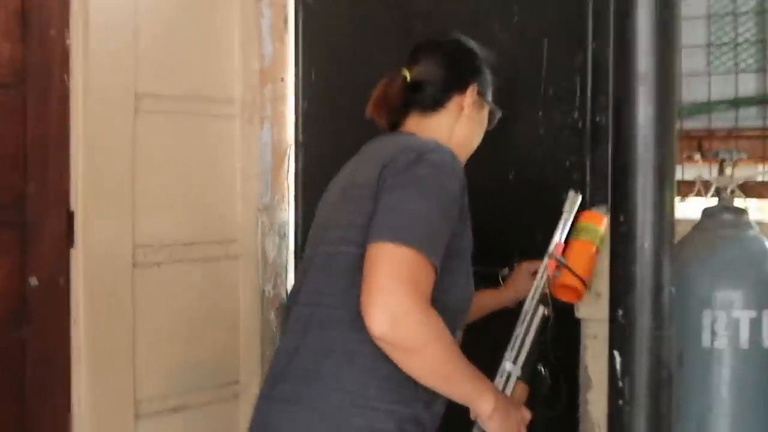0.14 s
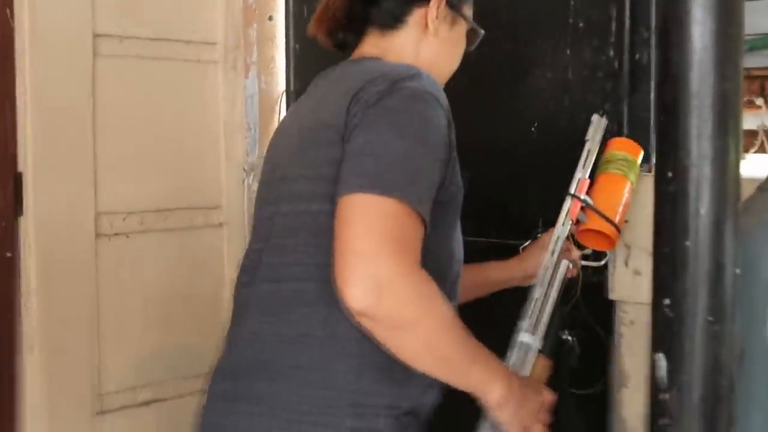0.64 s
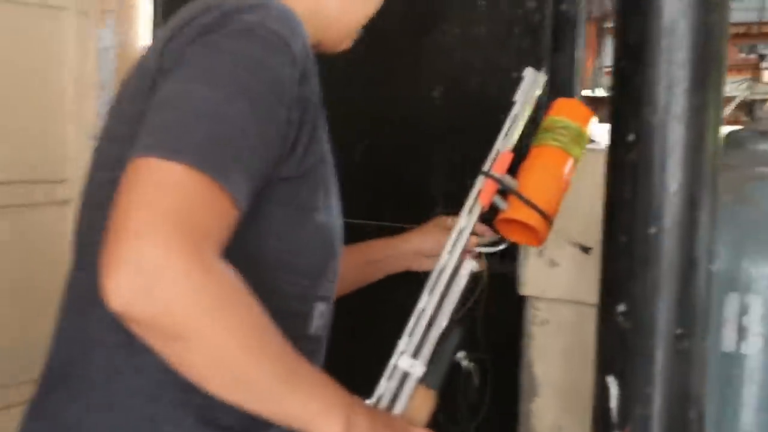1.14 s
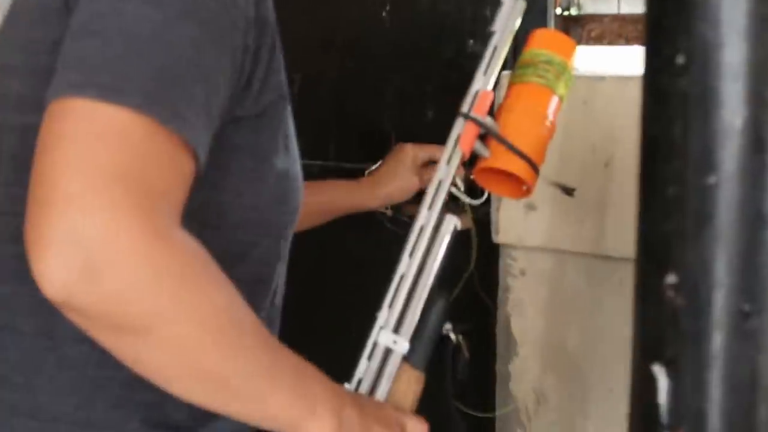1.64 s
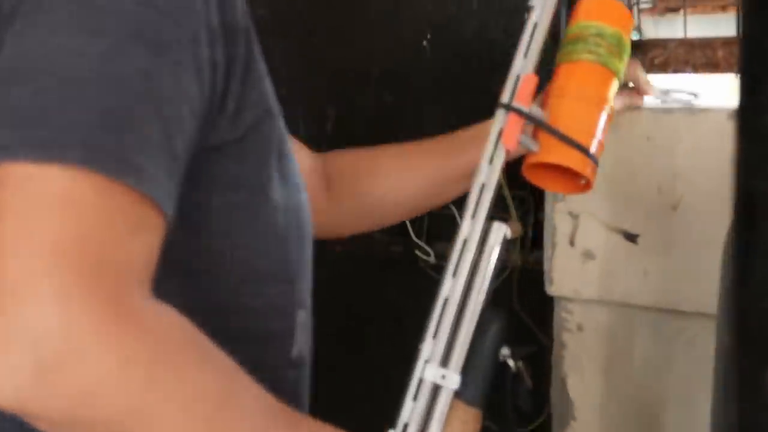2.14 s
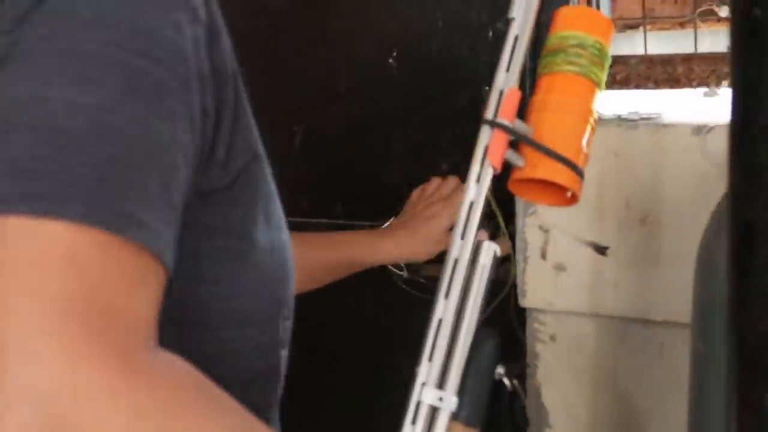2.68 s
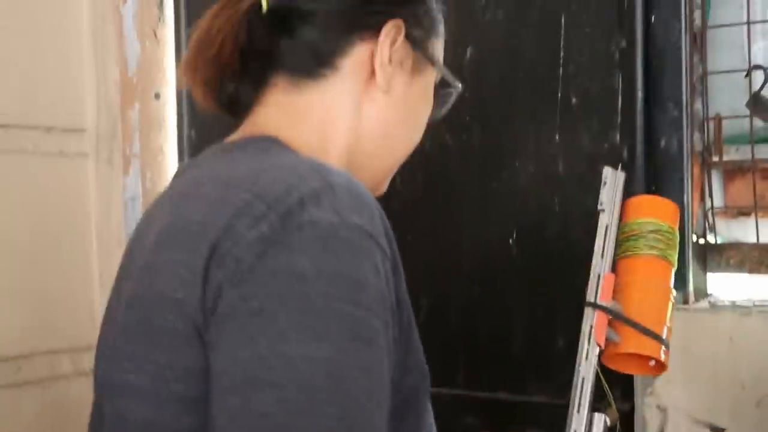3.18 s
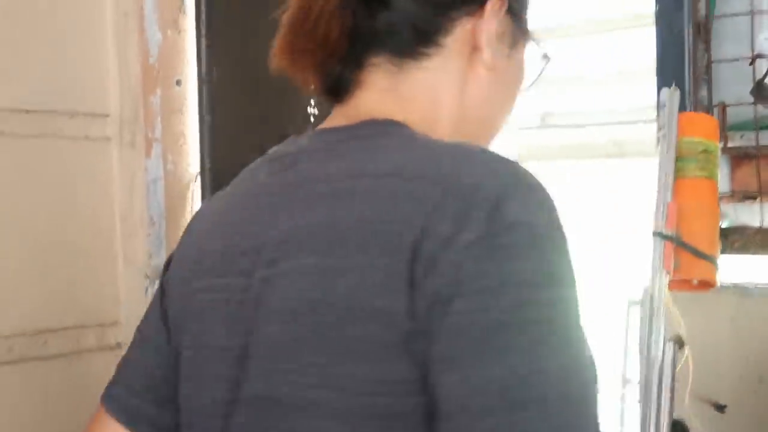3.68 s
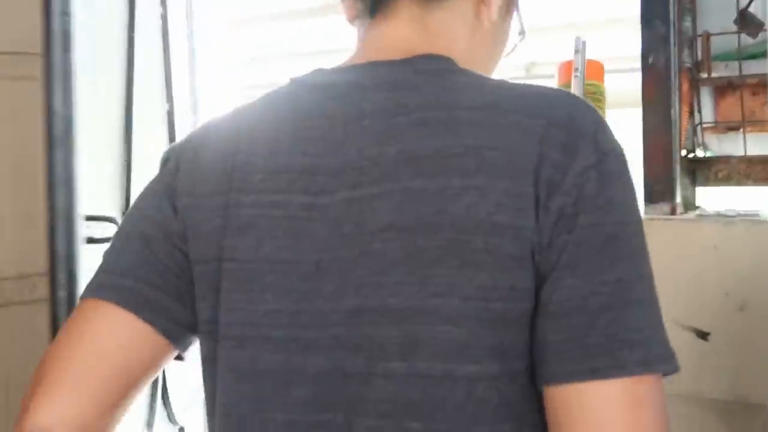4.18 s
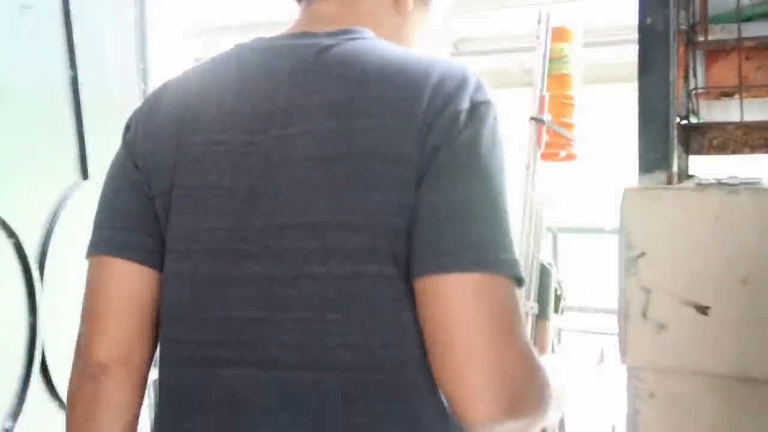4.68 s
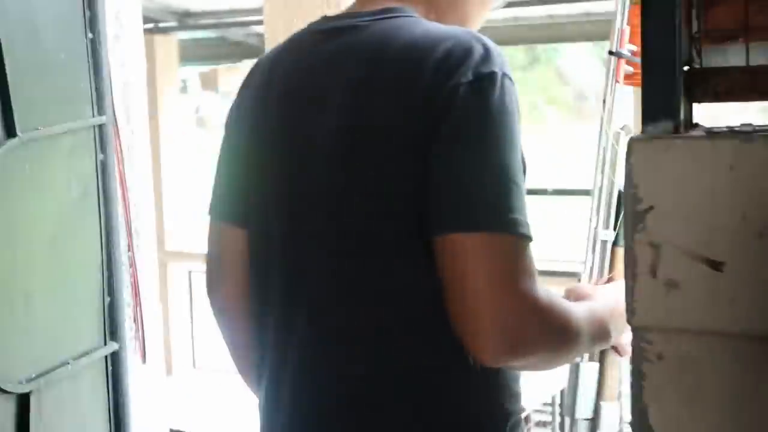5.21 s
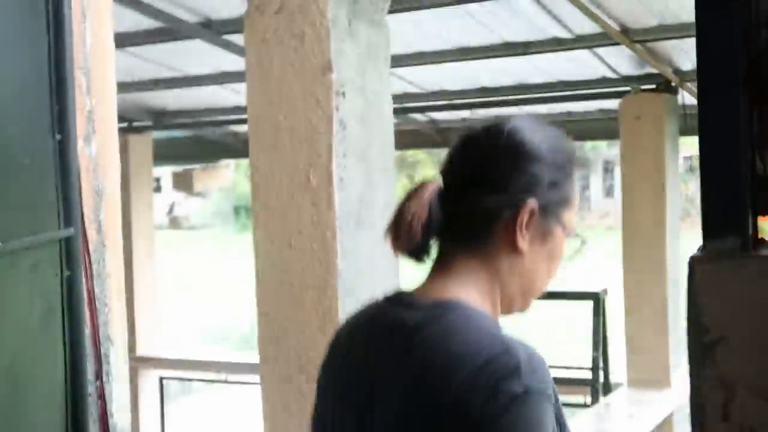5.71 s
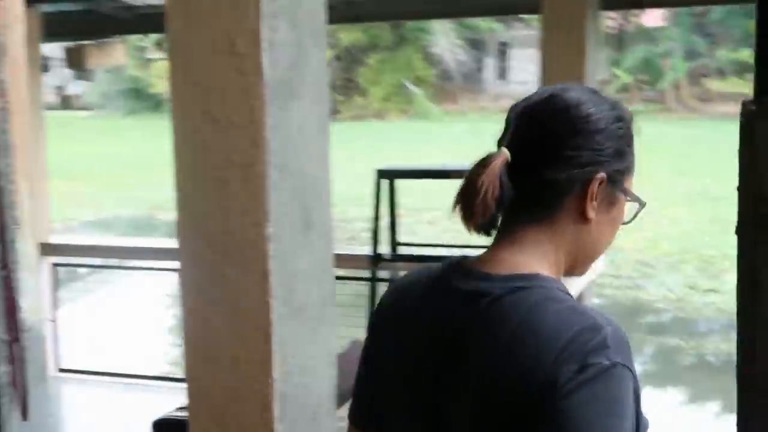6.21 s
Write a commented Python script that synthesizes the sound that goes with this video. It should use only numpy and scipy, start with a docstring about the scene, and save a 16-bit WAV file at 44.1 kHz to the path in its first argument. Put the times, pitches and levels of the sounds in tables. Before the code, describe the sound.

A handheld stereo microphone follows a person to a metal door. Shoes scrape sand, the latch is struck free with hard clacks, and the leaf thumps against its frame. The hinge gives a bright stick-slip squeak before the loudest stretch, a quick run of clattering blows with hollow booms. Afterwards come light scuffing steps beyond the doorway, soft wind bumps and a steady low rumble, with short hard room echoes.

```python
"""Inside a bare concrete shed, someone works the latch of a sheet-metal door and pushes it open.
Bursts of rough noise make the knocks, the latch and the slams; swelling noise makes the scuffing soles.
The hinge whines and squeaks in gliding tones; the shaking leaf rings its modes and booms in low tones.
Shaped noise gives the low rumble, the puffs of air and faint sounds from outside; sparse echoes give
the shed. Two close microphone ports hear it."""
import sys
import numpy as np
from scipy import signal
from scipy.fft import rfft, irfft
from scipy.io import wavfile
from scipy.ndimage import uniform_filter1d

SR = 44100
rng = np.random.default_rng(int(sys.argv[2]) if len(sys.argv) > 2 else 0)


def volts_from_db(level):
    """Convert decibel levels to linear amplitude ratios."""
    exponent = np.asarray(level, float) / 20
    return 10 ** exponent


def log_audio(samples):
    """Write samples as a 16-bit WAV file to the path given in sys.argv[1]."""
    # one column per channel
    frames = np.atleast_2d(samples).T
    # limit to full scale, then quantise
    limited = np.clip(frames, -1, 1)
    pcm = np.round(limited * 32767).astype(np.int16)
    wavfile.write(sys.argv[1], SR, pcm)


N = 279594
TIME = np.arange(N) / SR

# Modes of the sheet-metal leaf. Each row: frequency in Hz, width in Hz, relative level in dB.
DOOR_MODES = [(258, 24, -5), (311, 11, -7), (362, 34, 5), (454, 69, -2), (561.5, 51, 4), (647.4, 59, 5.5),
              (776, 112, 5), (895, 180, -2), (1130, 140, 1.5)]


def evened(x):
    """Scales to an rms of 1."""
    return x / np.sqrt(np.mean(x ** 2) + 1e-20)


def read(points, hz):
    """Reads a curve of (Hz, value) points on a log-frequency axis."""
    f, value = np.transpose(points)
    return np.interp(np.log(hz + 1), np.log(f + 1), value)


def band(x, low_hz, high_hz, order=2):
    """Band-pass that leaves white noise at about its rms."""
    sos = signal.butter(order, [low_hz, min(high_hz, SR / 2.1)], "bandpass", fs=SR, output="sos")
    kept_share = (high_hz - low_hz) / (SR / 2)
    return signal.sosfilt(sos, x) / np.sqrt(kept_share)


def ringing(x, modes, between_db):
    """Decaying resonances plus a flat direct share between them; white noise keeps its rms."""
    t = np.arange(8192) / SR
    rings = np.zeros(len(t))
    for hz, width_hz, db in modes:
        decay = np.exp(-np.pi * width_hz * t)
        rings += volts_from_db(db) * np.sqrt(width_hz) * decay * np.sin(2 * np.pi * hz * t)
    rings = rings / np.linalg.norm(rings)
    rings[0] = volts_from_db(between_db)
    return signal.oaconvolve(x, rings / np.linalg.norm(rings))[:N]


def spells(tables):
    """Reads each column over time, with a gain that is silent outside the tables."""
    out = np.zeros((len(tables[0][0]), N))
    for rows in tables:
        s, *columns = np.transpose(rows)
        inside = (TIME >= s[0]) & (TIME < s[-1])
        fade = signal.windows.tukey(inside.sum(), 0.08)
        out[:, inside] = [fade, *(np.interp(TIME[inside], s, column) for column in columns)]
    return out


def grit(per_s, spread_db):
    """Dense tiny impacts of uneven size, at rms 1."""
    size = volts_from_db(spread_db * np.minimum(rng.exponential(1, N), 4)) * rng.standard_normal(N)
    return evened(size * (rng.random(N) < per_s / SR))


def tone(hz, gain, waver, overtones=((1, 0),)):
    """A gliding tone, with (multiple, dB) partials, whose strength wavers."""
    angle = 2 * np.pi * np.cumsum(hz) / SR
    slow_noise = uniform_filter1d(uniform_filter1d(rng.standard_normal(len(hz)), 900), 900)
    wobble = 1 + waver * evened(slow_noise)
    return np.sqrt(2) * gain * wobble * sum(volts_from_db(db) * np.sin(k * angle) for k, db in overtones)


def lumps(middle_s, width_s, db):
    """Gain over time of one bell-shaped swell."""
    return volts_from_db(db) * np.exp(-0.5 * ((TIME - middle_s) / width_s) ** 2)


def blows(rows, rise_s):
    """Rough pushes that start sharply and die away; rows of start s, dB, t60 of the contact in s."""
    push = np.zeros(N)
    for s, db, t60 in rows:
        since = np.maximum(TIME - s, 0)
        push += volts_from_db(db - 60 * since / t60) * (1 - np.exp(-since / rise_s))
    return push * rng.standard_normal(N)


def rumble():
    """Distant noise with drifting patches; the hiss swells more than the deepest bass."""
    # Colour of the place. Each row: frequency in Hz, relative level in dB per Hz.
    colour = [(12, -57.5), (20, -20), (84, -3.5), (124, 0), (160, -1.5), (421, -8.5), (753, -20),
              (889, -21), (1990, -28.5), (4200, -34.5), (10500, -52), (12000, -60.5), (13400, -70.5),
              (15000, -107)]
    # Swell over time. Each row: time in seconds, level in dB before the bands follow it in their own measure.
    level_points = [(0, -27), (.6, -35.5), (1.2, -32), (2.0, -34.5), (2.55, -34), (3.3, -34), (3.55, -46),
                    (3.78, -36), (4.1, -36.5), (4.3, -33), (5.3, -28.5), (5.55, -33.5), (5.9, -33.5),
                    (6.34, -37)]
    # How far each band follows. Each row: frequency in Hz, dB of swell per dB of level.
    follows = [(60, 0.2), (250, 0.65), (900, 1.05), (3000, 0.7)]
    frames, hz = N // 256 + 5, np.fft.rfftfreq(1024, 1 / SR)
    a, b, patches = rng.standard_normal((frames, 513, 3)).T
    patches = evened(uniform_filter1d(uniform_filter1d(patches, 10, 0), 14, 1))
    level = np.interp(np.arange(frames) * 256 / SR, *np.transpose(level_points))
    swell_db = read(follows, hz)[:, None] * (level - np.median(level))
    z = (a + 1j * b) * volts_from_db(read(colour, hz)[:, None] + 0.42 * patches + swell_db)
    noise = signal.istft(z, nperseg=1024, noverlap=768)[1][:N]
    return volts_from_db(np.median(level)) * evened(noise)


def gusts():
    """Air moving past the microphone: soft puffs of bass noise."""
    # Each row: middle in seconds, width in seconds, level in dB.
    puffs = [(1.75, 0.22, -53), (4.3, 0.1, -39.5), (5.85, 0.12, -43), (6.3, 0.17, -37)]
    return sum(lumps(*row) for row in puffs) * band(rng.standard_normal(N), 33, 87)


def insect():
    """A thin steady whistle from outside: noise in one narrow band."""
    # In order: frequency in Hz, width in Hz, level in dB.
    hz, width_hz, db = (13000, 80, -86)
    return volts_from_db(db) * band(rng.standard_normal(N), hz - width_hz / 2, hz + width_hz / 2)


def wheeze():
    """Faint airy sound from outside: two fuzzy noise bands that swell once."""
    # Each row: frequency in Hz, width in Hz, level in dB.
    airy_bands = [(3600, 470, -57.5), (4830, 420, -59.5)]
    # When it is heard: start and end in seconds.
    start_s, end_s = (5.46, 5.78)
    inside = (TIME > start_s) & (TIME < end_s)
    swell = np.zeros(N)
    swell[inside] = signal.windows.tukey(inside.sum(), 0.6)
    return swell * sum(volts_from_db(db) * band(rng.standard_normal(N), hz - w / 2, hz + w / 2)
                       for hz, w, db in airy_bands)


def tail():
    """Sparse echoes of random sign, each band dying at its own speed."""
    # Decay of the bare shed. Each row: frequency in Hz, t60 in seconds.
    decay = [(150, 1), (500, 0.83), (1500, 0.57), (4000, 0.44), (9000, 0.39), (14000, 0.31)]
    taps = np.zeros(SR)
    at = np.arange(260, SR - 20, 20) + rng.integers(0, 20, (SR - 261) // 20)
    taps[at] = rng.choice([-1., 1.], len(at))
    hz, t, z = signal.stft(taps, SR, nperseg=256)
    echoes = signal.istft(z * volts_from_db(-60 * t / read(decay, hz)[:, None]), SR, nperseg=256)[1]
    return echoes / np.linalg.norm(echoes)


def shed(x, turns_per_s=9.0):
    """Blends two tails in turn: the echo pattern keeps changing as door and listener move."""
    turn = 2 * np.pi * turns_per_s * TIME
    return sum(signal.fftconvolve(x * share, tail())[:N] for share in (np.sin(turn), np.cos(turn)))


def scuffs():
    """Sand under a sliding sole; the hollow under the sole favours the middle."""
    # Each row: touch-down in seconds, slide in seconds until the sole presses hardest,
    # peak in dB, fizz in dB against it.
    slides = [(0.336, .057, -28.5, -23), (.885, 0.072, -25.5, -26), (1.699, 0.02, -22, -29),
              (2.2, 0.065, -30.5, -36), (4.14, 0.16, -43.5, -23), (5.865, 0.026, -40, -15),
              (6.04, 0.11, -32, -32)]
    from_db, lift_db_per_s = -14, -330  # a slide starts soft, swells to its peak, dies as the sole lifts
    body, fizz = np.zeros((2, N))
    for s, slide, db, fizz_db in slides:
        left = s + slide - TIME
        swell_db = np.where(left > 0, from_db * left / slide, -lift_db_per_s * left)
        press = (TIME > s) * volts_from_db(db + swell_db)
        body += press
        fizz += volts_from_db(fizz_db) * press
    sand = grit(12000, spread_db=1.0)
    middle = band(body * sand, 1800, 3900) + volts_from_db(-8) * band(body * sand, 3600, 7000)
    return middle + band(fizz * sand, 4700, 12200, order=4)


def whine():
    """The hinge slowing down: a thin wavering tone whose pitch mostly sinks."""
    # Each row: time in seconds, pitch in Hz, level in dB.
    glide = [(0, 1535, -38.5), (0.251, 1505, -63), (0.451, 1305, -47.5), (.65, 1222, -41.5),
             (0.802, 1175, -45), (.9, 1154, -30.5), (1.08, 1140, -45.5), (1.24, 1160, -50),
             (1.42, 1090, -50)]
    s, hz, db = np.transpose(glide)
    t = TIME[TIME < s[-1]]
    sound = tone(np.interp(t, s, hz), volts_from_db(np.interp(t, s, db)), 0.3, [(1, 0), (2, -19)])
    return np.pad(sound, (0, N - len(t)))


def squeak():
    """The hinge slips in lumps: a stick-slip tone with the hiss of rubbing metal under it."""
    # Each row: middle in seconds, width in seconds, level in dB.
    slip_rows = [(3.56, 0.019, -55), (3.591, 0.012, -21), (3.621, 0.0021, -25), (3.655, 0.014, -43),
                 (3.688, 0.0036, -39), (3.757, 0.012, -46.5), (3.83, 0.011, -46), (3.7, 0.063, -60.5)]
    # Each row: multiple of the pitch, level in dB against it.
    overtones = [(2, -17), (3, -24), (4, -32)]
    first_hz, sag_hz_per_s = 3572, 55  # pitch at the first slip, sinking slowly
    slips = sum(lumps(*row) for row in slip_rows)
    near = slips > volts_from_db(-100)
    hz = first_hz - sag_hz_per_s * (TIME[near] - slip_rows[0][0])
    out = volts_from_db(-28.5) * slips * band(rng.standard_normal(N), 2500, 5500)
    out[near] += tone(hz, slips[near], 0.16)
    for k, db in overtones:  # each wavers by itself
        out[near] += tone(hz, slips[near], 0.5, [(round(k), db)])
    return out


def boom():
    """The lowest flexing of the door leaf: each spell swells, drifts in pitch and fades."""
    # Each row: start in seconds, length in seconds, Hz at start, Hz at end, level in dB.
    flexing = [(0.576, 0.66, 121, 114.8, -37.5), (1.2, 0.18, 150, 151, -36.5),
               (1.453, 0.59, 141, 141.3, -33.5), (1.85, 0.72, 144, 146.3, -31),
               (2.55, 0.5, 148, 153.6, -31), (3.69, .22, 148, 151, -40), (3.997, 0.17, 149, 152.4, -38),
               (4.178, 0.15, 120, 128, -35), (4.355, 0.18, 156, 150, -27.5), (4.549, 0.53, 141, 132.9, -22),
               (5.091, 0.17, 137, 144.5, -28.5), (5.502, 0.26, 140, 136.7, -33.5),
               (5.776, 0.38, 144, 146.4, -30)]
    # Neighbouring modes. Each row: frequency ratio, level in dB.
    partners = [(1, -0.5), (1.235, -11.5), (1.45, -14.5)]
    edges = 0.34  # share of a spell spent swelling and fading
    out = np.zeros(N)
    for s, length, from_hz, to_hz, db in flexing:
        inside = (TIME >= s) & (TIME < s + length)
        along = (TIME[inside] - s) / length
        to_edge = np.minimum(along, 1 - along)
        swell = np.sin(np.pi / 2 * np.minimum(to_edge * 2 / edges, 1))
        out[inside] += tone(from_hz + (to_hz - from_hz) * along, volts_from_db(db) * swell, 0.27, partners)
    return out


def shudders():
    """The loose leaf chatters against its frame and rings its modes."""
    # One table a spell of shaking. Each row: time in seconds, shaking in dB, hardness of the chatter in dB.
    shaking = [
        [(.06, -59.5, 3.5), (.148, -38.5, 8), (.27, -52.5, 4.5), (.336, -39, 8), (.36, -73, 0)],
        [(1.37, -69, 11), (1.398, -42.5, -4), (1.452, -35, -20), (1.47, -50, -12), (1.56, -39, -18)],
        [(2.63, -42, -13), (2.692, -43.5, -8), (2.78, -38, -17.5), (3.006, -33.5, -2), (3.042, -40, 17),
         (3.1, -29.5, 6.5), (3.124, -49, 4), (3.2, -44, -14)],
        [(3.82, -39.5, -66), (3.876, -39, 14.5), (3.906, -35.5, -15), (4.1, -49.5, -62)],
        [(4.35, -25, 13), (4.402, -35.5, 12.5), (4.48, -31, 4), (4.572, -44, -79), (4.61, -35.5, 7),
         (4.722, -32.5, 2.5), (4.826, -36, -16), (4.94, -37.5, 9.5), (5.02, -27, -13), (5.044, -45.5, 10),
         (5.25, -62.5, 16.5)],
    ]
    fade, db, hard_db = spells(shaking)
    low = fade * volts_from_db(db) * grit(1400, spread_db=-0.5)
    # harder chatter wakes the upper modes a little and the clank fully
    high = low * volts_from_db(0.32 * hard_db)
    clank = low * volts_from_db(0.5 + hard_db)
    low_modes = band(ringing(low, DOOR_MODES, between_db=11), 273, 518)
    upper_modes = band(ringing(high, DOOR_MODES, between_db=9.0), 538, 927)
    return low_modes + upper_modes + band(clank, 910, 3000)


def slam():
    """The edge of the leaf meets the frame: a stiff blow wakes its middle modes."""
    # Each row: start in seconds, level in dB, t60 of the contact in seconds.
    meetings = [(.317, -21, .025), (3.081, -9, .035), (3.098, -14, .045)]
    return band(ringing(blows(meetings, 0.0011), DOOR_MODES, between_db=4), 370, 1030)


def latch():
    """The latch bar is struck free and rebounds: rough blows ring its modes."""
    # Each row: start in seconds, level in dB, t60 of the contact in seconds.
    drops = [(1.569, -15, 0.03), (1.581, -22, 0.11)]
    # Modes of the bar. Each row: frequency in Hz, width in Hz, relative level in dB.
    bar_modes = [(1670, 130, -14), (1965, 130, 1), (2090, 120, -5), (2610, 120, -1), (2930, 110, 2),
                 (3190, 130, 0), (3790, 150, -4)]
    return band(ringing(blows(drops, 0.00033), bar_modes, between_db=-9.5), 1750, 5100, order=3)


def knocks():
    """Each contact is a short rough push that drives the leaf, the latch and the air."""
    # Blows on latch and door. Each row: start in seconds, click in dB, weight (thud against the click) in dB,
    # fizz against the click in dB, contact time in seconds.
    contacts = [(0.069, -30, -5.5, -26, 0.13), (0.128, -16.5, -12, 2, 0.14),
                (0.318, -25.5, -7.5, -30, 0.047), (0.718, -54, 20, -3, 0.073),
                (0.8768, -35.5, 2.5, -27, 0.39), (1.2084, -55, 14.5, -4, 0.062),
                (1.3881, -31.5, 2, -13.5, 0.091), (1.459, -54, 26.5, -17, 0.12),
                (1.5703, -34, -25, -40, 0.59), (1.71, -16.5, -17, -7, 0.1),
                (1.7472, -17, -11.5, -12.5, 0.099), (2.1665, -19.5, -29, -5, 0.046),
                (2.5115, -44, -42, -23, 0.09), (2.633, -59, 20.5, -2, 0.27), (2.6971, -45.5, 13, -2, 0.087),
                (2.776, -35.5, 9, -28, 0.18), (3.0286, -37.5, 19.5, -19, 0.17),
                (3.08, -20, -15.5, -5, 0.13), (3.6885, -46.5, -24, -10, 0.074),
                (3.8246, -55, 16.5, -25, 0.046), (3.8645, -25, -9, -33, 0.054),
                (3.9118, -53, 25.5, -17, 0.05), (4.2745, -37, -32, -27, 0.098),
                (4.35, -14.5, -8, -2.5, 0.14), (4.412, -13, 1, 1, 0.027), (4.4704, -18.5, -11, -26, 0.037),
                (4.5948, -25.5, -5.5, -4.5, 0.12), (4.618, -15.5, 1.5, -10.5, 0.034),
                (4.657, -30, 6, -0.5, 0.16), (4.7022, -21.5, -4.5, -3, 0.053),
                (4.7218, -25.5, 1.5, -8, 0.099), (4.7842, -19.5, 1, -4, 0.038),
                (4.8534, -24, 0, -5.5, .096), (4.8838, -21.5, 0, -10, 0.09),
                (4.9287, -19.5, -4.5, -1.5, 0.043), (4.9631, -26.5, 1.5, -10, 0.16),
                (5.0367, -18, 0, -10, .068), (5.3088, -67, 1, -15, .069), (6.2228, -55.5, 0, -15.5, 0.23)]
    # How long thud, clank, click and fizz take to fall 60 dB. Each row: multiple of the contact time.
    lasting = [
        [1.4],
        [1.2],
        [.9],
        [.7],
    ]
    drive = np.zeros((4, N + 8192))
    t = np.arange(8192) / SR
    for s, db, weight_db, fizz_db, contact_s in contacts:
        fall_db = 60 * t / (max(contact_s, 0.004) * np.array(lasting))
        tick = 1 + 0.52 * np.exp(-t / 0.00075)  # the first touch is the hardest
        push = volts_from_db(db - fall_db) * (1 - np.exp(-t / 0.003)) * tick
        clank_db = 4 + 0.79 * weight_db  # the clank of the latch grows with the weight of the blow
        at = round(s * SR)
        drive[:, at:at + 8192] += volts_from_db(np.array([[weight_db], [clank_db], [0], [fizz_db]])) * push
    thud, clank, click, fizz = drive[:, :N] * [grit(14000, spread_db=2.5) for _ in range(4)]
    thud = band(ringing(thud, DOOR_MODES, between_db=12.5), 180, 1290)
    return thud + band(clank, 780, 2020) + band(click, 2160, 6520) + band(fizz, 6700, 13000)


def field():
    """All sounds of the scene together, each call with fresh noise."""
    hits = knocks() + scuffs() + shudders()
    near = latch() + slam()
    hinge = squeak() + whine()
    outside_db = -8 * (TIME > 5.6)  # steps beyond the doorway feed the shed less
    echoing = hits * volts_from_db(outside_db) + volts_from_db(-6) * near + volts_from_db(-14) * hinge  # near sounds are drier
    background = rumble() + gusts() + insect() + wheeze()
    return hits + near + hinge + volts_from_db(-2.5) * shed(echoing) + boom() + background


def scene():
    """The sound field at the microphone, and an unrelated look at it from another side."""
    return np.array([field(), field()])


def band_limit(x):
    """A steep low-pass at the top of the band."""
    return signal.sosfilt(signal.butter(12, 16320, fs=SR, output="sos"), x)


def record(dry):
    """Two ports that agree in the bass and part in the treble, then a soft overload."""
    # Response of the microphone. Each row: frequency in Hz, gain in dB.
    response = [(30, -0.5), (1000, 3.5), (6000, -0.5), (10000, -1.5), (12500, 4), (15000, -3)]
    # Each row: frequency in Hz, difference of the ports against their sum in dB.
    apart = [(60, -31), (120, -31), (240, -25), (480, -22), (950, -18), (1890, -14), (3770, -7), (7520, -1),
             (15000, 5)]
    # Each row: frequency in Hz, part of the difference due to travel time between the ports.
    spacing_share = [(500, .3), (3000, .5), (9000, .65), (15000, .65)]
    hz = np.fft.rfftfreq(N, 1 / SR)
    mid, other = rfft(dry) * volts_from_db(read(response, hz))
    share = np.clip(read(spacing_share, hz), 0, 1)
    # a small delay turns the phase
    side = volts_from_db(read(apart, hz)) * (1j * share * mid + np.sqrt(1 - share ** 2) * other)
    ports = irfft(np.array([mid + side, mid - side]), N)
    overloaded = 0.95 * np.tanh(ports / 1.072)
    return band_limit(overloaded)


dry = scene()
out = record(dry)
log_audio(out)
```